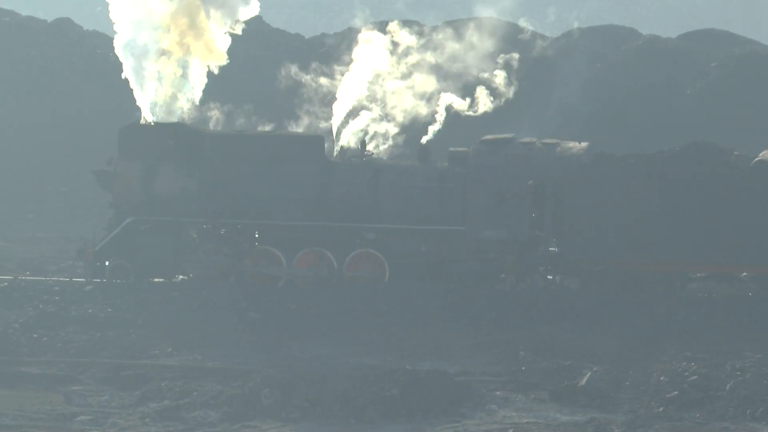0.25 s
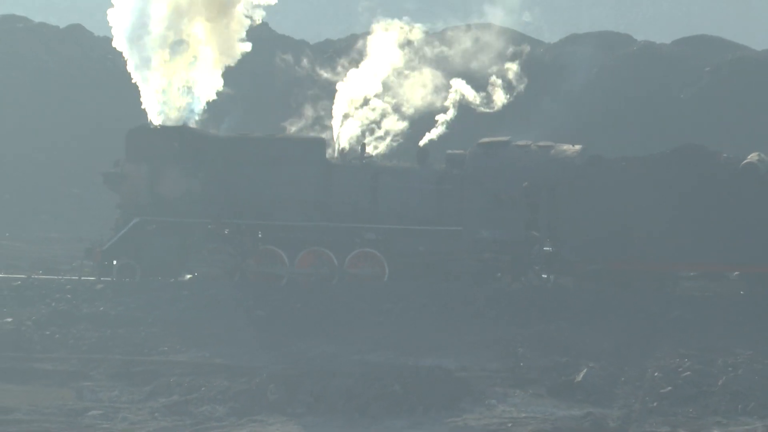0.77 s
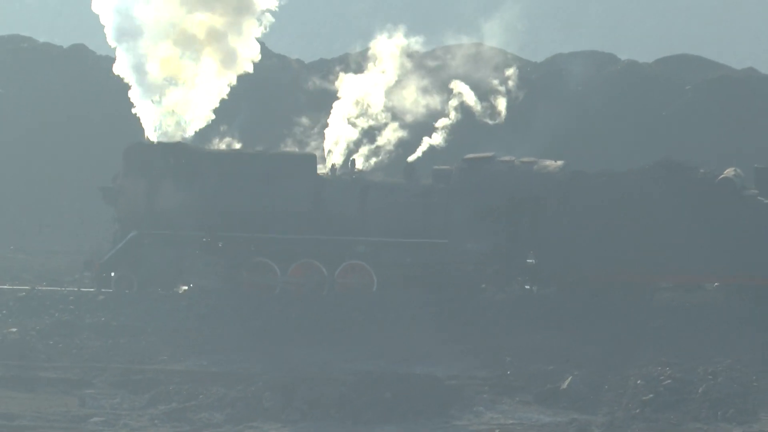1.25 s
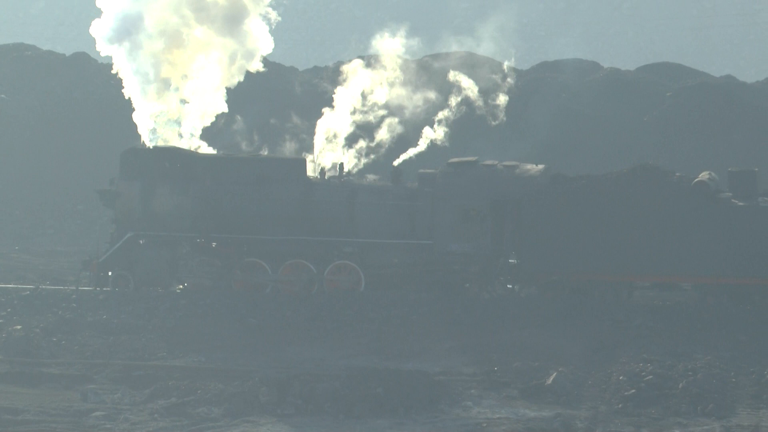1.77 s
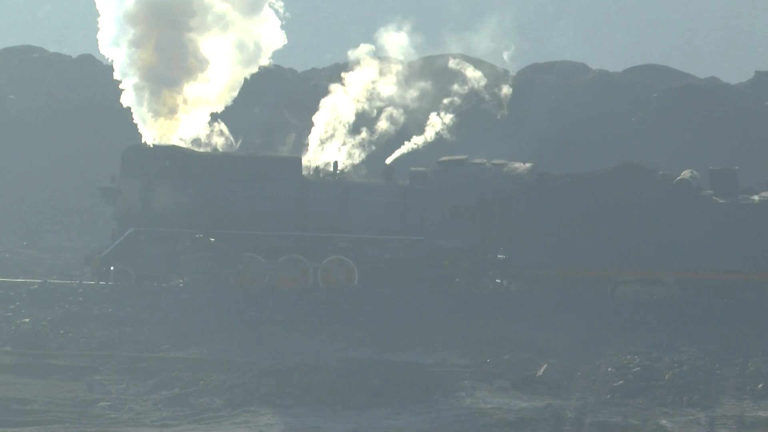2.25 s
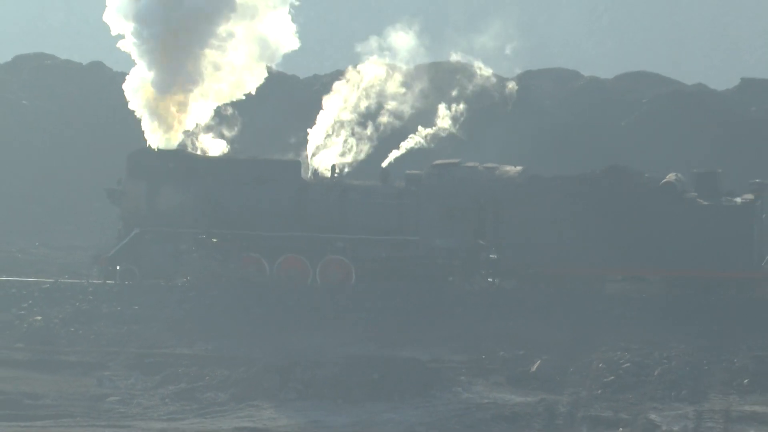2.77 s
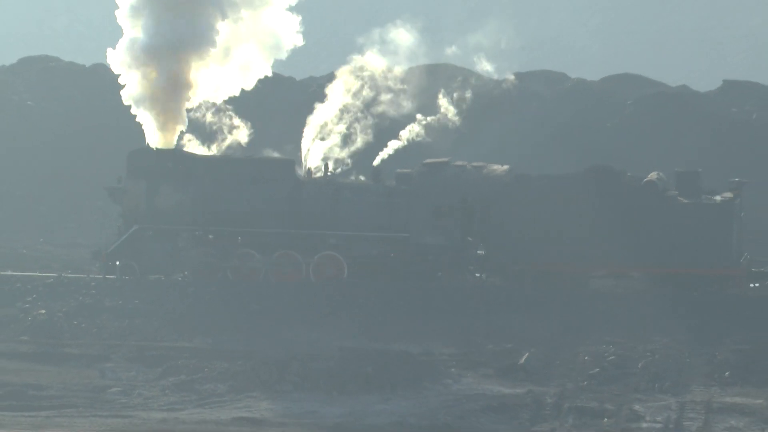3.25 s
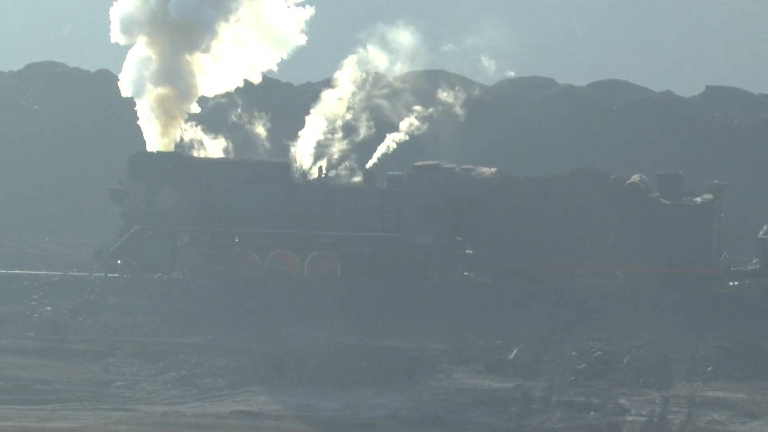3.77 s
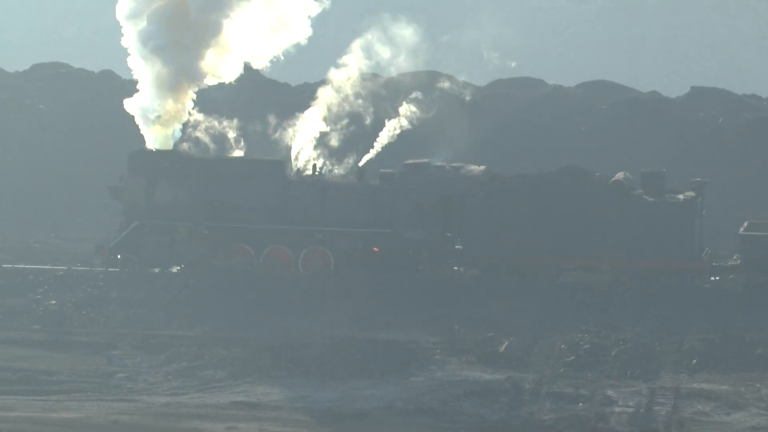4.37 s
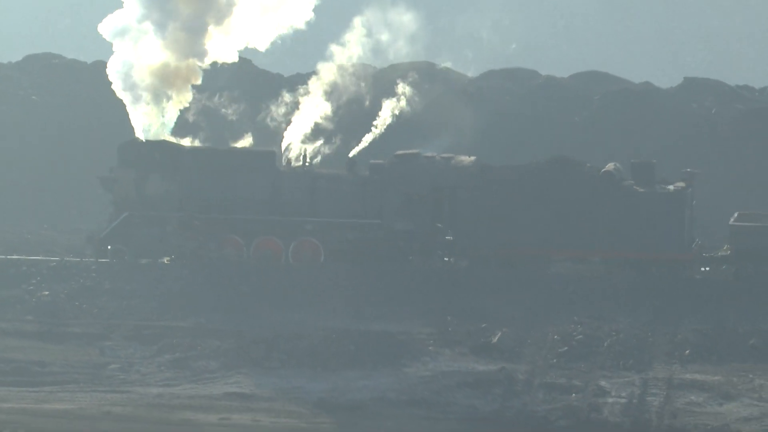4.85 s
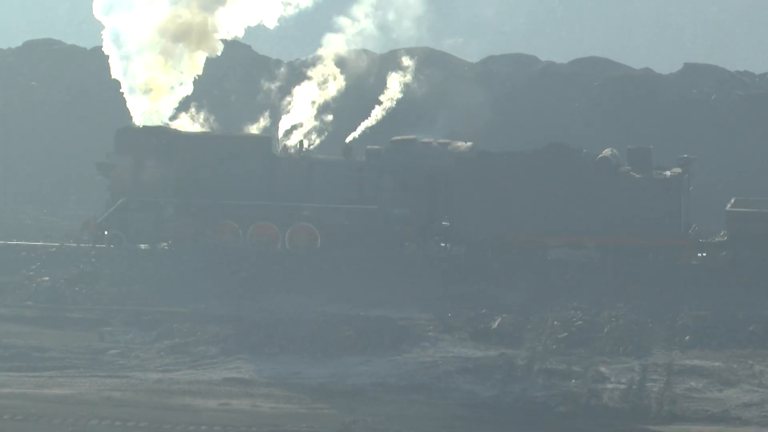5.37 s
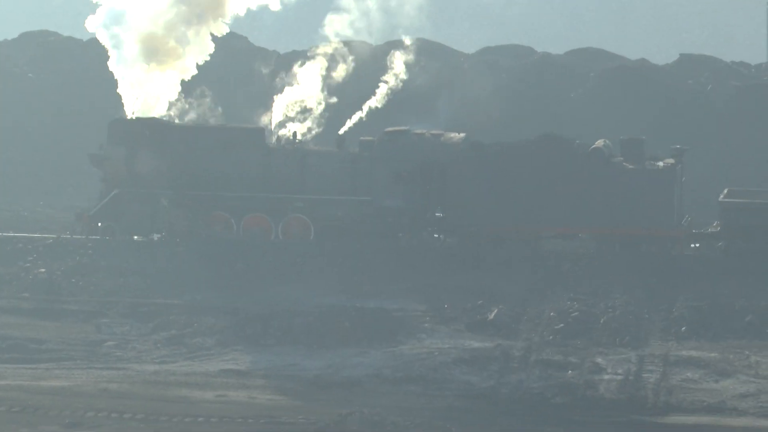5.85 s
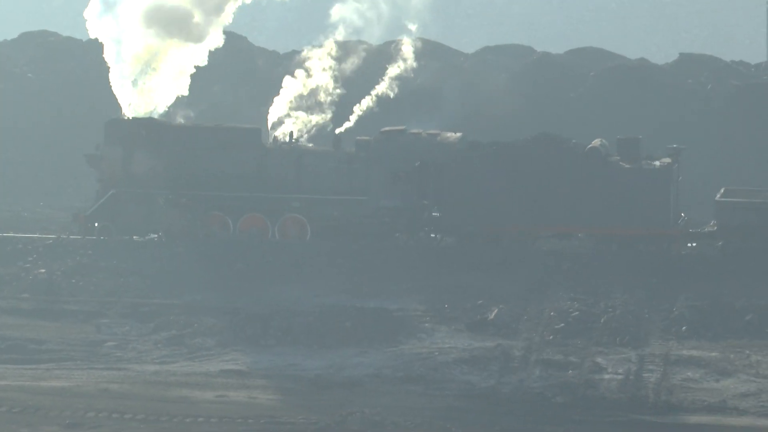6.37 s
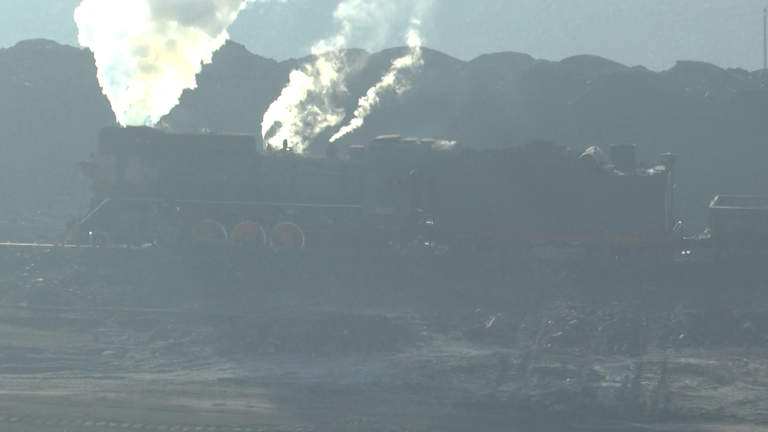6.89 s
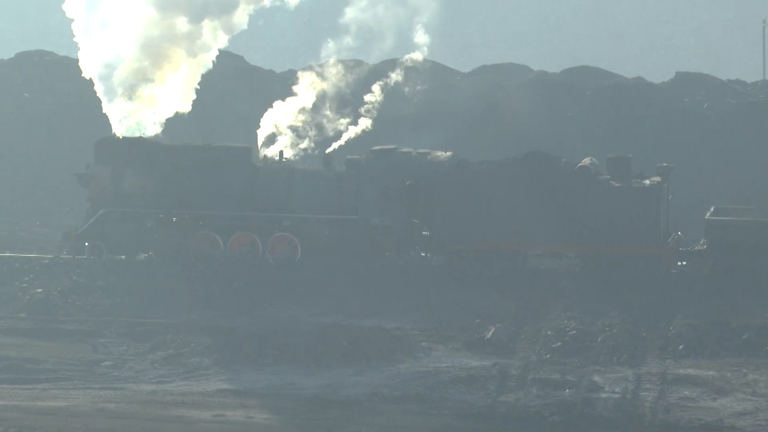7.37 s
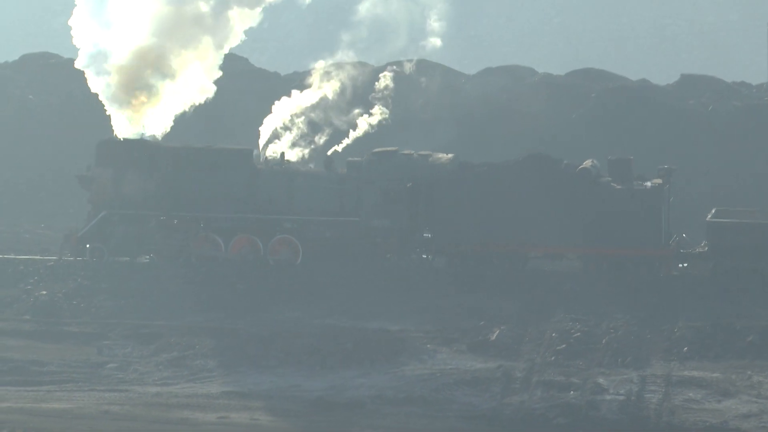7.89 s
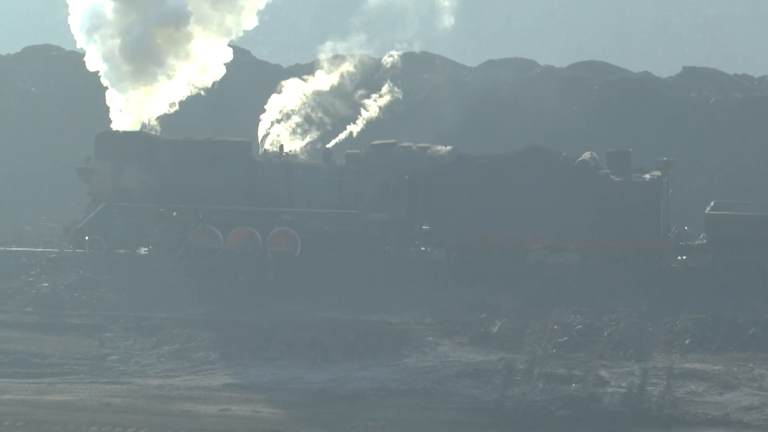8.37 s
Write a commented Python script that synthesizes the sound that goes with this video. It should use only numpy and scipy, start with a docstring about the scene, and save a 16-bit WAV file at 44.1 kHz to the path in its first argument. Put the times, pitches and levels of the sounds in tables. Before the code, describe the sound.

Outdoors, some way from a steam locomotive straining to start. Steam hisses in a steady alternating beat, about five strokes in two seconds, over a continuous valve blow. After a couple of seconds the wheels slip and the chimney barks six quick deep chuffs, then a weak one. Near the end a thin whine rises and one soft chuff follows. Slight echo from earth banks.

```python
"""Steam locomotive struggling to start

A steam locomotive some way off struggles to start a heavy train. Steam hisses from a cylinder in a steady
out-and-back beat, probably the air pump's; the wheels slip and the chimney barks in a quick run, and once
more later. A valve blows steadily and a thin whine sets in. The steam sounds are noise driven by flow, the
whine is a rising sine, and the inverted echo off the ground hollows the steam sounds by comb filtering."""
import sys
import numpy as np
from scipy import signal
from scipy.fft import rfft, irfft
from scipy.io import wavfile

SR = 44100
rng = np.random.default_rng(int(sys.argv[2]) if len(sys.argv) > 2 else 0)


def generate_wav(signal):
    """Clip the signal to [-1, 1] and save it as 16-bit WAV at the path in sys.argv[1]."""
    frames = np.transpose(np.atleast_2d(signal))
    scaled = np.clip(frames, -1, 1) * 32767
    pcm = np.round(scaled).astype(np.int16)
    wavfile.write(sys.argv[1], SR, pcm)


N = 380564
TIME, HZ = np.arange(N) / SR, np.fft.rfftfreq(N, 1 / SR)


def gain_of(db):
    """Logarithmic level: decibels to an amplitude ratio."""
    return 10 ** (np.asarray(db) / 20)


def read(points, hz):
    """Spectral envelope: table points joined by straight lines on a log-frequency axis."""
    point_hz, value = np.transpose(points)
    return np.interp(np.log(hz + 1), np.log(point_hz + 1), value)


def shaped(x, gain):
    """Linear filtering: every frequency of x is multiplied by its own gain."""
    return irfft(rfft(x) * gain, N)


def wander(rate_hz):
    """Low-passed noise: a slow random curve of unit deviation, up to about rate_hz."""
    x = shaped(rng.standard_normal(N), np.exp(-(HZ / rate_hz) ** 2))
    return x / x.std()


def eddies(depth_db, rate_hz):
    """Turbulent modulation: a jet swells and sags at random, with mean power 1."""
    gain = gain_of(depth_db * wander(rate_hz))
    return gain / np.sqrt(np.mean(gain ** 2))


def jet(flow, spectrum):
    """Aerodynamic noise: the flow sets the strength of turbulence, which is then coloured."""
    return shaped(flow * rng.standard_normal(N), gain_of(read(spectrum, HZ)))


def microphone_noise():
    """Low microphone noise: a faint rumble, its power falling steeply above 70 Hz."""
    return shaped(rng.standard_normal(N), 1 / (1 + (HZ / 70) ** 2))


# Reverberation of the surrounding earth banks.
# Each row: frequency [Hz], time to decay by 60 dB [s].
BANK_DECAY = [(150, 0.76), (800, 0.33), (3000, 0.17), (10000, 0.35)]


def banks(x):
    """Diffuse reverberation: scattered echoes as noise, each frequency decaying at its own rate."""
    hz, t, z = signal.stft(rng.standard_normal(SR), SR, nperseg=256)
    decay = gain_of(-60 * t / read(BANK_DECAY, hz)[:, None])
    z = z * decay * (t > .025)  # no echo in the first 25 ms
    tail = signal.istft(z, SR, nperseg=256)[1]
    return signal.fftconvolve(x, tail / np.linalg.norm(tail))[:N]


# Spectrum of the faint difference between left and right.
# Each row: frequency [Hz], gain [dB].
SIDE_WIDTH = [(125, -47), (300, -30), (550, -28.5), (1000, -25), (2200, -21.5), (4500, -24.5),
              (8000, -14.5), (12000, -43)]


def side_spread(x):
    """Stereo width: a faint diffuse difference between left and right, following the engine."""
    return shaped(banks(x), gain_of(read(SIDE_WIDTH, HZ)))


# Inverted echo off the ground; shares below zero count as no echo.
# Each row: frequency [Hz], share of the direct sound before the gain of each source's echo [ratio].
GROUND_ECHO = [(300.0, 0.26), (900.0, -0.009), (1400.0, 0.45), (2100.0, 0.36), (3500.0, 0.16),
               (6500.0, 0.57), (11000.0, -1.1)]
GROUND_DELAY_S = .002527
# Peaks and dips of the air path and the microphone.
# Each row: centre [Hz], distance at which the dB value has fallen to 1/e [Hz], height [dB].
PATH_COLOUR = [(484.0, 57.0, -13.0), (726.0, 43.0, 7.0), (889.0, 28.0, -5.0), (1086.0, 45.0, 5.0),
               (1254.0, 108.0, -7.0), (1578.0, 72.0, -7.0), (1934.0, 69.0, 5.0), (7973.0, 726.0, -7.0),
               (10058.0, 1097.0, 8.0)]


def path(x, echo_db):
    """Interference: the inverted ground echo cancels evenly spaced frequencies, under added peaks and dips."""
    share = np.clip(gain_of(echo_db) * read(GROUND_ECHO, HZ), 0, 1)
    comb = 1 - share * np.exp(-2j * np.pi * HZ * GROUND_DELAY_S)
    colour_db = sum(db * np.exp(-((HZ - hz) / width) ** 2) for hz, width, db in PATH_COLOUR)
    return shaped(x, comb * gain_of(colour_db))


# Faint thin ticks close to the microphone.
# Each row: time of the peak [s], level before the treble filter [dB].
TICK_EVENTS = [(3.876, -61), (6.408, -58)]


def ticks():
    """Impulsive noise: a few milliseconds of pure treble each."""
    level = sum(gain_of(db) * np.exp(-((TIME - s) / 0.0029) ** 2) for s, db in TICK_EVENTS)
    return shaped(level * rng.standard_normal(N), 1 - np.exp(-(HZ / 6000) ** 4))


WHINE_START_S, WHINE_ATTACK_S = 7.0, .35
WHINE_HZ, WHINE_HZ_PER_S = 711, 12.5
WHINE_DB, WHINE_DB_PER_S = -65, 7


def whine():
    """Tonal source, perhaps a wheel flange on the rail: a wavering sine creeps up in pitch and level."""
    age = np.maximum(TIME - WHINE_START_S, 0)
    hz = WHINE_HZ + WHINE_HZ_PER_S * age + 1.5 * wander(rate_hz=20)
    level = np.minimum(age / WHINE_ATTACK_S, 1) * gain_of(WHINE_DB + WHINE_DB_PER_S * age)
    wavering = eddies(depth_db=1.4, rate_hz=14)
    phase = 2 * np.pi * np.cumsum(hz) / SR
    return np.sqrt(2) * level * wavering * np.sin(phase)


# The two strokes of the piston, one abrupt and long, one soft, louder and short.
# Each row: first start [s], level before each stroke's offsets [dB], opening time [s],
# time for the main part of the flow to halve [s].
PISTON_BEAT = [(-.212, -38.5, 0.015, 0.19), (.18, -36, 0.032, 0.15)]
CYCLE_S = .8302  # the piston goes out and back once
# The strokes in turn, as the shifting air carries them.
# Each row: strength [dB], extra hiss [dB], extra fizz [dB].
STROKE_LEVELS = [(3, -4, -6), (-0.5, -2.5, 2.5), (-4, 2.5, -3), (0.5, 1.5, 0), (1, -0.5, -3.5),
                 (-0.5, 8, 9), (-2.5, 6, 9.5), (-5, 1.5, 1), (-5.5, -1, -3), (-3.5, -1.5, -0.5),
                 (0.5, .5, 3), (.5, 5.5, -6), (1, -8.5, -3), (-1, 1.5, 0), (0, 2, 2.5), (1.5, 0.5, -5.5),
                 (1, -3, -3), (2, -3.5, 4), (-0.5, 1.5, 1.5), (2, 0, 2), (4, 1, -4), (1.5, 4, 4)]


def stroke_times():
    """Periodic motion: the two strokes alternate at a steady pace."""
    count = np.arange(len(STROKE_LEVELS))
    return np.array(PISTON_BEAT)[count % 2, 0] + CYCLE_S * (count // 2)


# Spectrum of the steady valve jet.
# Each row: frequency [Hz], gain [dB].
VALVE_SPECTRUM = [(40, -57), (83, -55), (142, -51.5), (285, -46), (505, -49), (910, -53), (1400, -49.5),
                  (2130, -44), (2600, -49.5), (3700, -51), (4980, -59), (7000, -70), (10900, -78.5),
                  (15500, -80)]
# The valve's offset, and the shares of stroke strength and extra hiss that it follows.
VALVE_DB, VALVE_PER_STRENGTH, VALVE_PER_HISS = .5, .55, .25


def valve():
    """Continuous jet noise: steam blows off the boiler top, carried by the same air as the strokes."""
    strength_db, hiss_db, _ = np.transpose(STROKE_LEVELS)
    followed_db = VALVE_PER_STRENGTH * strength_db + VALVE_PER_HISS * hiss_db
    carried_db = np.interp(TIME, stroke_times(), followed_db)
    return jet(gain_of(VALVE_DB + carried_db) * eddies(depth_db=1.38, rate_hz=13.6), VALVE_SPECTRUM)


def pressure(offsets_db, steepness, linger, linger_s):
    """Discharge: each cylinder port opens quickly; the flow holds, drops away, and a share trails on."""
    power = np.zeros(N)
    for k, (start, offset_db) in enumerate(zip(stroke_times(), offsets_db)):
        _, level_db, opening_s, halving_s = PISTON_BEAT[k % 2]
        age = np.maximum(TIME - start, 0)
        opening = 1 - np.exp(-(age / opening_s) ** 2)
        main_flow = (1 - linger) / (1 + (age / halving_s) ** steepness)
        trailing = linger * np.exp(-age / linger_s)
        power += (gain_of(level_db + offset_db) * opening * (main_flow + trailing)) ** 2
    return np.sqrt(power)


# Spectra of the three parts of the cylinder jet: broad rush, hiss, finest fizz.
# Each row: frequency [Hz], gain [dB].
RUSH_SPECTRUM = [(40, -17), (83, -25), (142, -11.5), (285, -2.5), (505, 1), (910, -0.5), (2130, 7),
                 (3490, 3.5), (4980, -17), (7000, -25.5), (11000, -49)]
HISS_SPECTRUM = [(100, -33), (900, -39), (2130, 2.5), (3490, 8), (4980, 0.5), (7000, -16), (11000, -34),
                 (15500, -50)]
FIZZ_SPECTRUM = [(3000, -49), (6000, -18.5), (8000, -15.5), (10900, -19), (15500, -33)]
HISS_DB, FIZZ_DB = -6, -6.5  # flow against the rush of the same stroke, before each stroke's extra


def cylinders():
    """Pulsed jet noise: a broad rush at each stroke; hiss and fizz last only while pressure is high."""
    strength_db, hiss_db, fizz_db = np.transpose(STROKE_LEVELS)
    flutter = eddies(depth_db=.5, rate_hz=28)
    rush_flow = pressure(strength_db, steepness=3.86, linger=0.2, linger_s=.17)
    hiss_flow = pressure(strength_db + HISS_DB + hiss_db, steepness=5.8, linger=0.22, linger_s=0.05)
    fizz_flow = pressure(strength_db + FIZZ_DB + fizz_db, steepness=5.9, linger=0.28, linger_s=.065)
    rush = jet(flutter * rush_flow, RUSH_SPECTRUM)
    hiss = jet(flutter * hiss_flow, HISS_SPECTRUM)
    fizz = jet(flutter * fizz_flow, FIZZ_SPECTRUM)
    return rush + hiss + fizz


# The chimney blasts in turn.
# Each row: time of the peak [s], strength [dB], rasp against the thump [dB], swelling time [s],
# dying time [s].
CHIMNEY_BLASTS = [(2.592, -19, -11, 0.013, 0.048), (2.96, -19.5, -11, .011, 0.04),
                  (3.199, -20.5, -13.5, 0.0093, 0.035), (3.414, -22.3, -12, .012, .046),
                  (3.652, -22.5, -15.5, 0.014, 0.032), (3.938, -22.5, -7.5, 0.018, 0.023),
                  (4.378, -30.5, .5, 0.035, 0.032), (8.316, -30, -6.5, 0.051, 0.097)]


def blasts(offsets_db, linger, linger_s):
    """Transient envelope: each blast swells to a sharp peak and dies; a share lingers in the plume."""
    power = np.zeros(N)
    for (peak, strength_db, _, swelling_s, dying_s), offset_db in zip(CHIMNEY_BLASTS, offsets_db):
        before, after = np.maximum(peak - TIME, 0), np.maximum(TIME - peak, 0)
        swelling = np.exp(-(before / swelling_s) ** 1.2)
        dying = (1 - linger) * np.exp(-after / dying_s) + linger * np.exp(-after / linger_s)
        power += (gain_of(strength_db + offset_db) * swelling * dying) ** 2
    return np.sqrt(power)


# Spectra of the chimney: deep thump, bark of the throat, rasp.
# Each row: frequency [Hz], gain [dB].
THUMP_SPECTRUM = [(20, -42), (40, -26), (80, -20), (125, 5.5), (200, 11), (285, 16.5), (370, 17.5),
                  (440, 10), (650, -0.5), (1000, -5.5), (2200, -9), (5000, -68)]
THROAT_SPECTRUM = [(80, -16), (300, 1), (520, 13.5), (740, 8.5), (1000, 0), (1400, -4.5), (2200, -5),
                   (3500, -25), (7000, -66)]
RASP_SPECTRUM = [(30, -20), (100, 1.5), (500, 6), (910, -12.5), (2130, 8), (3490, 4.5), (4980, -4.5),
                 (7000, -20.5), (10900, -28.5), (15500, -42)]
THROAT_DB, THROAT_DB_PER_BEAT = -3, 0.66  # the throat barks harder the more blasts come in a second
# A weaker blast keeps more of its boom below this pitch.
BOOM_DB, BOOM_HZ, BOOM_PER_WEAKNESS = -1.2, 159, 0.48


def chimney():
    """Exhaust noise: each blast is a lumpy thump, a bark from the throat and a rasp torn into crackles."""
    peaks, strength_db, rasp_db, _, _ = np.transpose(CHIMNEY_BLASTS)
    beats_per_s = 1 / np.gradient(peaks)
    weakness_db = strength_db.mean() - strength_db
    boom_db = BOOM_DB + BOOM_PER_WEAKNESS * weakness_db
    throat_db = THROAT_DB + THROAT_DB_PER_BEAT * beats_per_s
    lumps = eddies(depth_db=.8, rate_hz=60)
    crackles = eddies(depth_db=1.0, rate_hz=1400)
    boom = jet(lumps * blasts(boom_db, linger=0.21, linger_s=0.13), THUMP_SPECTRUM)
    thump = jet(lumps * blasts(np.zeros(len(peaks)), linger=0.13, linger_s=0.16), THUMP_SPECTRUM)
    throat = jet(lumps * blasts(throat_db, linger=0.091, linger_s=0.21), THROAT_SPECTRUM)
    rasp = jet(lumps * crackles * blasts(rasp_db, linger=0.26, linger_s=0.086), RASP_SPECTRUM)
    # the boom fills the power below the crossover, the thump the power above it
    deep = 1 / (1 + (HZ / BOOM_HZ) ** 8)
    return shaped(boom, np.sqrt(deep)) + shaped(thump, np.sqrt(1 - deep)) + throat + rasp


LEFT_DB, RIGHT_DB = 3.38, 3.22  # gain at each microphone


def scene():
    """Mid-side superposition: the engine is straight ahead; a faint spread and low noise form the side."""
    steam = path(cylinders() + chimney(), echo_db=.5) + path(valve(), echo_db=4.0)
    engine = steam + whine()
    mid = engine + gain_of(-21) * banks(engine) + ticks()
    side = side_spread(engine) + gain_of(-57.5) * microphone_noise()
    return np.array([gain_of(LEFT_DB) * (mid + side), gain_of(RIGHT_DB) * (mid - side)])


EDGE_HZ = 16300


def record(dry):
    """Band limiting: the recorder's low-pass removes what lies above its edge."""
    lowpass = signal.firwin(511, EDGE_HZ, window=("kaiser", 9), fs=SR)
    return signal.oaconvolve(dry, lowpass[None], "same")


dry = scene()
out = record(dry)
generate_wav(out)
```